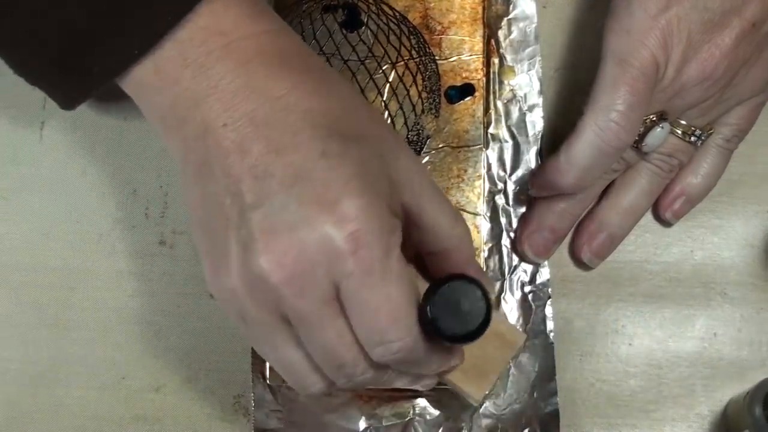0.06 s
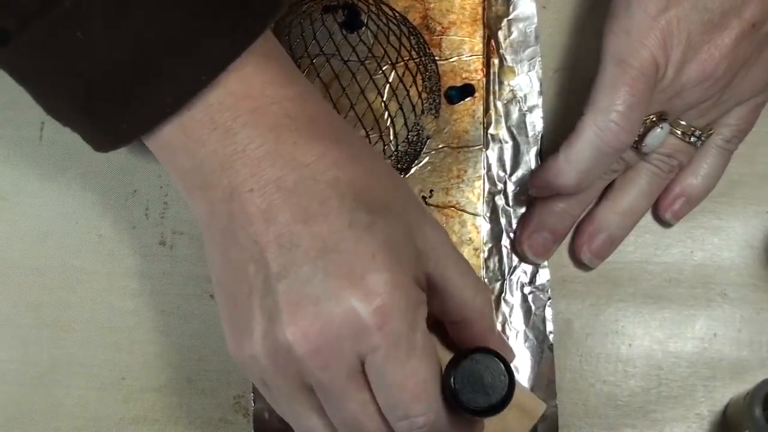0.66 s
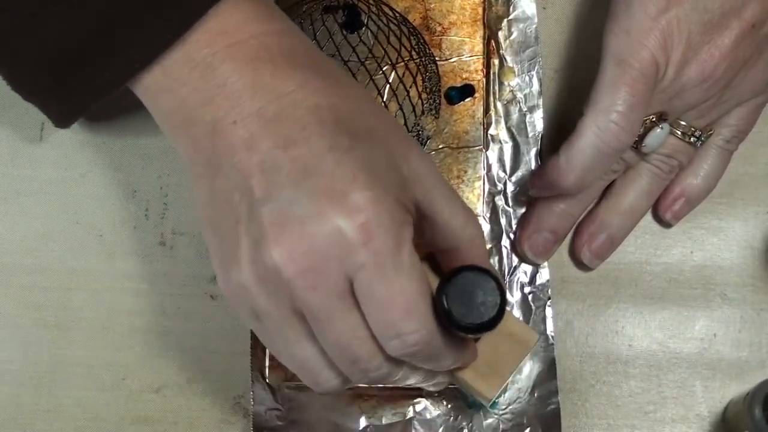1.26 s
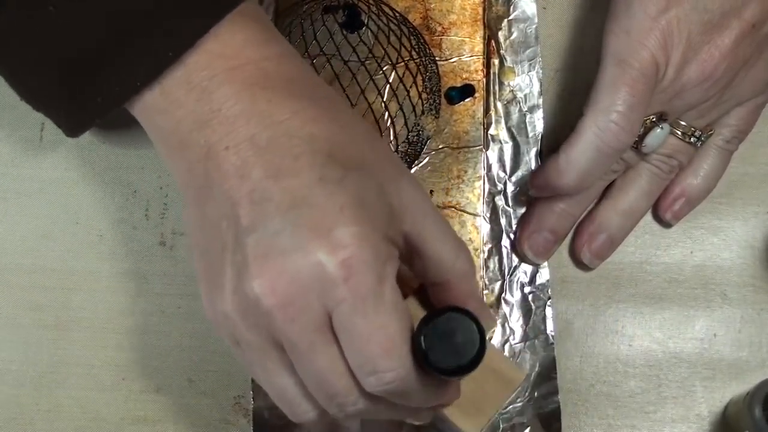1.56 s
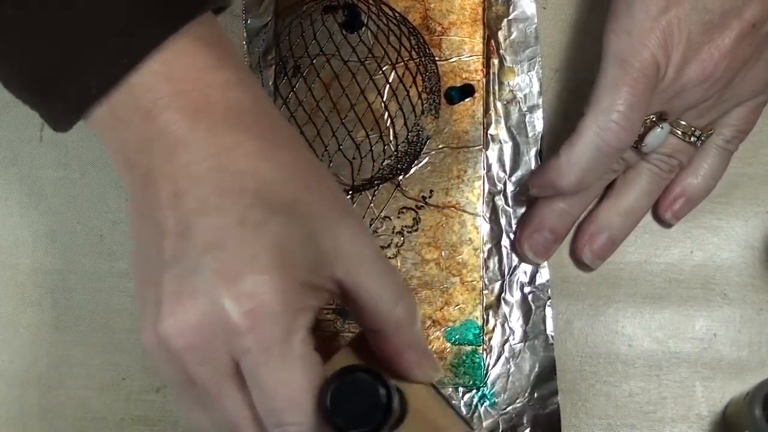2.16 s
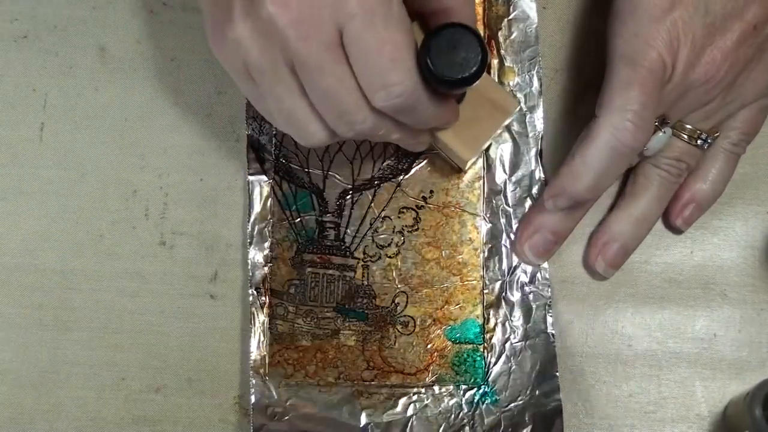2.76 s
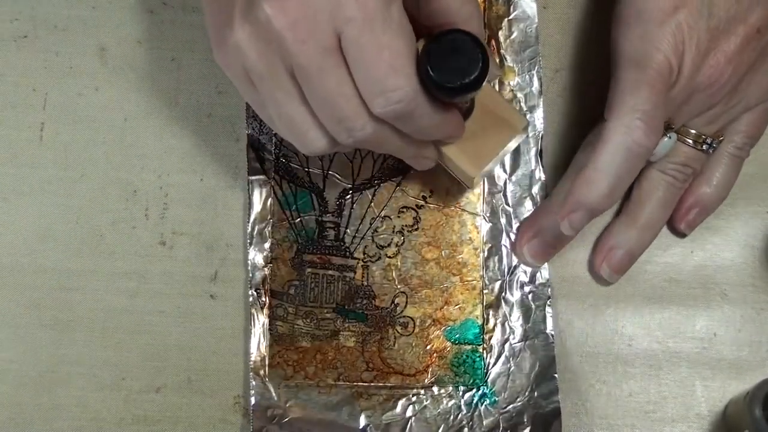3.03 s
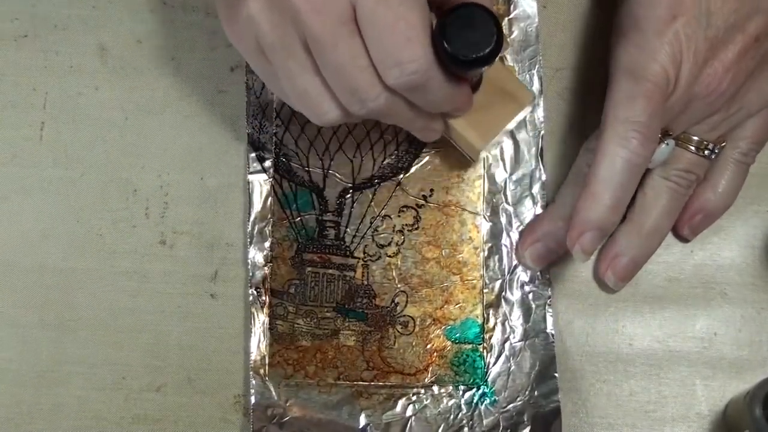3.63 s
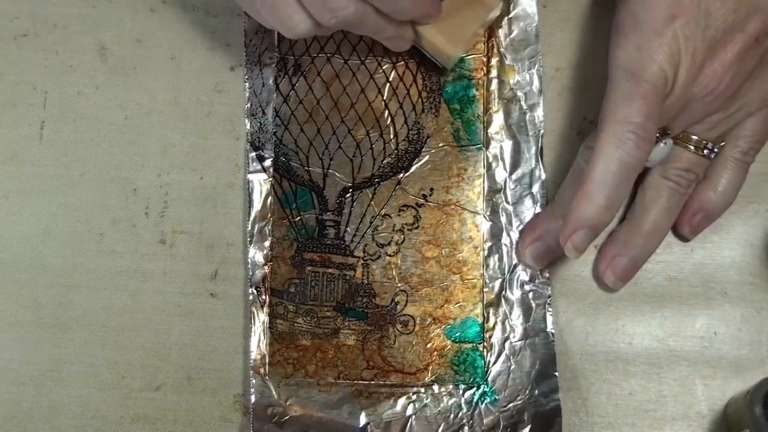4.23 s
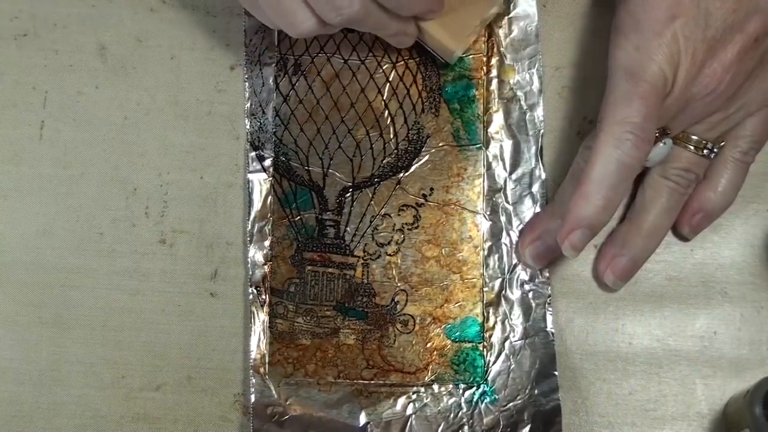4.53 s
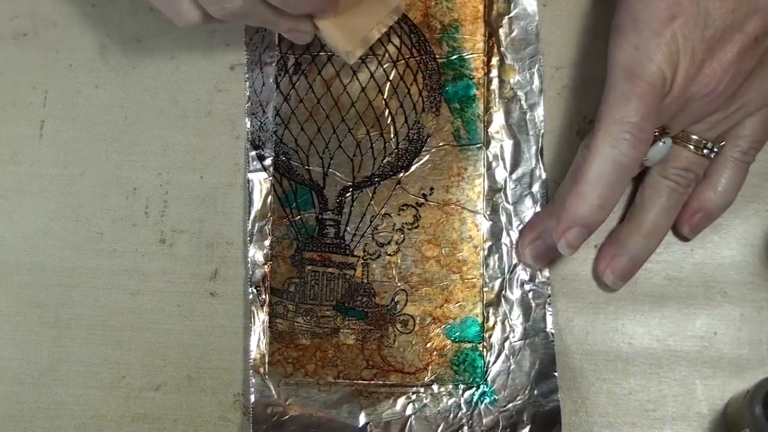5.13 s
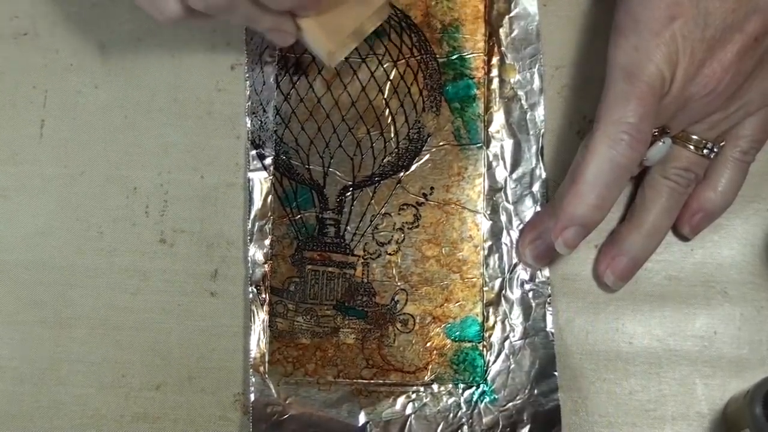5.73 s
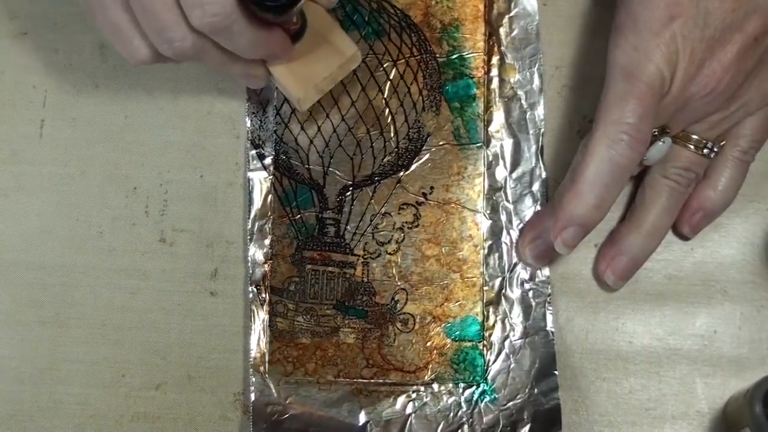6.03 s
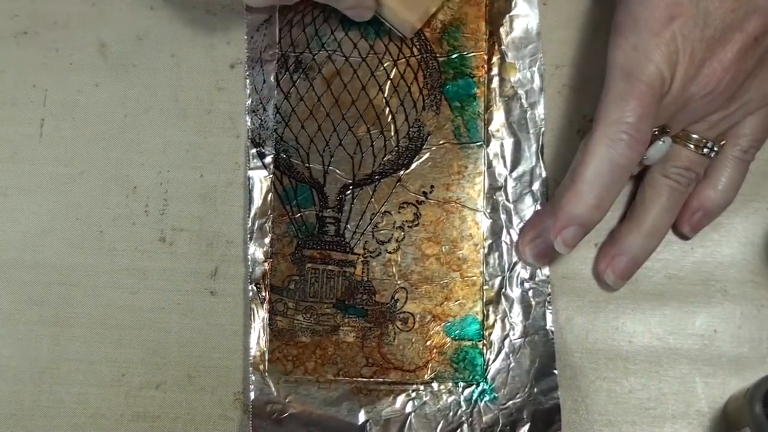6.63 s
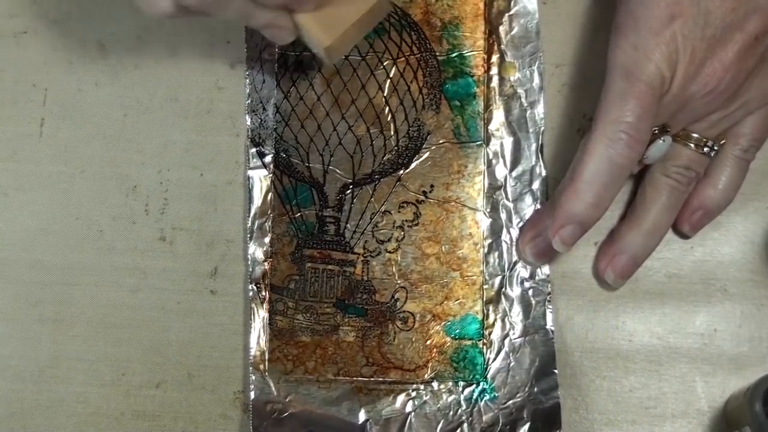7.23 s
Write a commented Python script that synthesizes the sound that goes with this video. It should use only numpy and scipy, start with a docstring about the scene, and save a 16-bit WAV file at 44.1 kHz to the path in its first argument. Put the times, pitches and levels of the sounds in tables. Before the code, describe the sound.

A felt pad on a wooden block dabs a foil-covered tag on a craft table, heard close in a small room. Each dab is a soft, low thump with a bright crinkle, often a sharp little foil snap, and a faint loose ticking as the pad peels away. From the start to about 2 seconds come ten uneven dabs with crisp snaps, the heaviest near 0.7 seconds. After a pause, dabbing resumes at 2.8 seconds, about six a second, with fuller, slightly duller crinkling and a strong snap near 3.9 seconds. It breaks off around 4.6 seconds and restarts at 5.1, easing near 6.5 seconds before two firmer dabs at about 7 and 7.2. A very soft arm brush and a faint rattle follow around 7.4 seconds. Quiet room hiss, low hum and a thin whine run throughout.

```python
"""In a small room with hiss and a thin whine, a felt ink pad on a wooden block dabs a foil-covered tag.
Each dab thumps the craft table and crushes the foil, which snaps as it buckles or peels off the tacky felt;
something loose chatters as the hand lifts. The first dabs land on the bright, bare foil border.
After a pause at two seconds the pad works up the duller, card-backed foil, about six dabs a second,
with a short break midway. A brush of the arm and a faint rattle end it as the hand swings away."""
import sys
import numpy as np
from scipy import signal
from scipy.fft import rfft, irfft
from scipy.io import wavfile
from scipy.ndimage import map_coordinates

SR = 44100
rng = np.random.default_rng(int(sys.argv[2]) if len(sys.argv) > 2 else 0)


def unload_wav(signal):
    """Save mono or channel-first audio to the path in sys.argv[1] as 16-bit WAV at rate SR, clipped to [-1, 1]."""
    wavfile.write(
        sys.argv[1],
        SR,
        np.round(np.clip(np.atleast_2d(signal).T, -1, 1) * 32767).astype(np.int16),
    )


N = 329956
TIME = np.arange(N) / SR
EVENT_TIME = np.arange(SR // 2) / SR


def undb(db):
    """Decibels to gain."""
    return 10 ** (np.asarray(db) / 20)


def unit(x):
    """Scale to rms 1."""
    return x / np.sqrt(np.mean(x ** 2))


def add(track, start_s, x):
    """Mix x into the track from start_s on."""
    start = min(round(start_s * SR), N)
    x, start = x[max(-start, 0):], max(start, 0)
    track[start:start + len(x)] += x[:N - start]


def band(x, lo_hz, hi_hz, order=2):
    """Band-pass."""
    return signal.sosfilt(signal.butter(order, [lo_hz, hi_hz], "band", fs=SR, output="sos"), x)


def resonate(x, modes):
    """Ring x through parallel resonances: pitch_hz, width_hz, level_db."""
    return sum(undb(db) * signal.lfilter(*signal.iirpeak(hz, hz / width, SR), x)
               for hz, width, db in modes)


def coloured(curve):
    """Noise of rms 1 shaped by an EQ curve: frequency_hz, level_db."""
    hz, db = np.transpose(curve)
    bins_hz = np.maximum(np.arange(N // 2 + 1) * SR / N, 1)
    gain = undb(np.interp(np.log(bins_hz), np.log(hz), db))
    return unit(irfft(rfft(rng.standard_normal(N)) * gain, N))


def crackle(per_s, spread_db):
    """Dense tiny clicks of uneven size."""
    clicks = (rng.random(N) < per_s / SR) * rng.choice([-1, 1], N)
    return clicks * undb(spread_db * np.minimum(rng.exponential(size=N), np.pi))


def swell(peak_s, width_s, db):
    """A bell-shaped envelope around peak_s."""
    envelope, middle_s = np.zeros(N), EVENT_TIME.mean()
    add(envelope, peak_s - middle_s, undb(db) * np.exp(-((EVENT_TIME - middle_s) / width_s) ** 2))
    return envelope


def stereo(mid, side, width):
    """Mid and side to left and right; close microphones hear nearly the same."""
    return mid + width * side * np.array([[1], [-1]])


def reverb(x, t60_s, lo_hz, hi_hz, db, width):
    """Diffuse tail of a small room, different at the two microphones."""
    tail = band(rng.standard_normal((2, len(EVENT_TIME))), lo_hz, hi_hz)
    tail *= np.exp(-np.log(1000) * EVENT_TIME / t60_s) * (1 - np.exp(-EVENT_TIME / 0.0014))
    tail *= undb(db) / np.sqrt(np.sum(tail ** 2, axis=1, keepdims=True))
    mid, side = signal.fftconvolve(x[None], tail, axes=1)[:, :N]
    return stereo(mid, side, width)


# hum and whine of the room and camera: pitch_hz, level_db
HUM_TONES = [(107.7,-71.5),(1440,-83),(2281,-72.5)]
# EQ of the room tone, centre and sides: frequency_hz, relative_db
ROOM_MID_EQ = [(15,-39),(26,-6),(38,2),(52,-10),(75,5.5),(130,1.5),(240,-2),(560,-10),(1020,-13),(1480,-15),(1940,-17),(2400,-15.5),(3820,-19.5),(8500,-19.5),(16000,-24.5)]
ROOM_SIDE_EQ = [(15, -66), (25, -40), (58, -35), (92, -15), (166, -13.5), (489, -11), (1940, -20),
                (2220, -22.5), (6920, -33), (13200, -44.5), (16000, -80)]
def room_tone(mid_db=-57.5, side_db=-59.5):
    """A bed of room rumble and microphone hiss, with a fluttering hum and whine."""
    tones = sum(undb(db) * np.sqrt(2) * np.sin(2 * np.pi * (hz * TIME + rng.random()))
                for hz, db in HUM_TONES)
    flutter = 1 + 0.23 * unit(band(rng.standard_normal(N), 8, 46))
    mid = undb(mid_db) * coloured(ROOM_MID_EQ) + tones * flutter
    return stereo(mid, coloured(ROOM_SIDE_EQ), undb(side_db))


# arm moves: peak_s, half_length_s, level_db
ARM_BRUSHES = [(0.617,.015,-62),(2.385,0.022,-61),(4.385,0.031,-63.5),(6.383,0.028,-62.5),(7.376,0.035,-61.5)]
def sleeve():
    """A soft brush as the arm shifts over the tag."""
    envelope = sum(swell(*brush) for brush in ARM_BRUSHES)
    return envelope * unit(band(rng.standard_normal(N), 680, 1430))


# the dabs, which cue block, chatter, rustle, thump and crush:
# hit_s, thump_db, crush_db, crush_length_s, peel_db, first_tick_db
DAB_CUES = [(0.002, -36.5, -44, 0.018, -65, -66), (0.302, -34.5, -48.5, 0.014, -57, -49.5),
            (0.507, -30.5, -59, 0.004, -56, -56), (0.6877, -22.5, -44, 0.021, -54.5, -50),
            (1.147, -37, -54, 0.012, -75, -66), (1.3612, -37.5, -48.5, 0.018, -69, -72),
            (1.5337, -31.5, -51, 0.012, -69, -59), (1.703, -28.5, -50, 0.005, -58, -51.5),
            (1.872, -31.5, -55, 0.0065, -52.5, -52), (2.043, -27, -58, 0.004, -58, -52),
            (2.801, -38.5, -37.5, 0.0041, -60, -55.5), (3, -34, -36, 0.01, -72, -61),
            (3.173, -30, -37.5, 0.013, -58, -48.5), (3.3453, -30.5, -35, 0.0056, -68, -51.5),
            (3.5244, -33, -35.5, 0.023, -72, -49), (3.7098, -32, -32.5, 0.019, -62, -48),
            (3.883, -30.5, -34, 0.02, -51, -48), (4.062, -30.5, -40, 0.051, -57, -54),
            (4.236, -35.5, -42, 0.043, -64, -50), (4.397, -43.5, -52.5, 0.005, -71, -63),
            (4.5528, -30.5, -38.5, 0.02, -68, -55), (5.1267, -32.5, -38.5, 0.019, -59, -64),
            (5.307, -31.5, -39.5, 0.02, -54, -44.5), (5.473, -33.5, -42.5, 0.049, -55, -48),
            (5.6606, -27.5, -40.5, 0.075, -71, -54), (5.8317, -30.5, -47.5, 0.064, -73, -47.5),
            (6.0016, -34.5, -44.5, 0.034, -67, -48), (6.1567, -34.5, -48, 0.017, -79, -58.5),
            (6.335, -34, -45, 0.0055, -59.5, -55), (6.506, -41, -53, 0.006, -52, -63),
            (6.6613, -43, -60, 0.006, -54, -74), (6.8184, -37, -55, 0.0049, -55.5, -53.5),
            (6.9962, -29.5, -41.5, 0.04, -58, -55), (7.171, -25.5, -41.5, 0.083, -65, -48)]
# resonances of the wooden block: pitch_hz, width_hz, level_db
BLOCK_MODES = [(530,500,7.5),(900,260,3.5),(1260,190,9.5),(1657,210,9.5)]
def block_knocks(lead_s=0.0067, rise_s=0.0036, fade_s=0.019, gain_db=-25):
    """A little of each blow gets through the felt into the wooden block."""
    knock = (1 - np.exp(-EVENT_TIME / rise_s)) * np.exp(-EVENT_TIME / fade_s)
    envelope = np.zeros(N)
    for hit_s, thump_db, *_ in DAB_CUES:
        add(envelope, hit_s - lead_s, undb(thump_db + gain_db) * knock)
    return envelope * unit(resonate(band(rng.standard_normal(N), 280, 2130), BLOCK_MODES))


# rattles as the hand swings away from the tag: start_s, first_tick_db
HAND_SWINGS = [(2.18, -50.5), (7.423, -54)]
# resonances of the loose thing: pitch_hz, width_hz, level_db
CHATTER_MODES = [(1720,300,-7),(2400,400,-8),(3000,400,-8),(5100,300,3),(6900,800,0),(8200,1100,-3)]
def chatter(period_s=0.03, jitter=0.094, fall_db=8.5, scatter_db=2.5, gain_db=3.5, count=4):
    """Something loose ticks once on the downstroke, then rocks in fading ticks as the hand lifts."""
    downstroke_lead_s, downstroke_db, lift_lag_s = 0.0217, -10.5, 0.066
    rise_s, fade_s = 0.0026, 0.0037
    ticks = [(hit_s - downstroke_lead_s, db + downstroke_db) for hit_s, *_, db in DAB_CUES]
    lifts = [(hit_s + lift_lag_s, db) for hit_s, *_, db in DAB_CUES]
    turn = np.arange(count)
    for start_s, db in lifts + list(HAND_SWINGS):
        slips, sizes = rng.standard_normal((2, count))
        times_s = start_s + period_s * (turn + jitter * slips)
        ticks += zip(times_s, db - fall_db * turn + scatter_db * sizes)
    contact = (1 - np.exp(-(EVENT_TIME / rise_s) ** 2)) * np.exp(-EVENT_TIME / fade_s)
    envelope = np.zeros(N)
    for tick_s, db in ticks:
        add(envelope, tick_s - 2 * rise_s, undb(db + gain_db) * contact / contact.max())
    grains = band(crackle(per_s=9700, spread_db=4.5), 1120, 6940, order=3)
    return resonate(envelope * grains, CHATTER_MODES) / np.std(resonate(grains, CHATTER_MODES))


# the pad's path along the tag: time_s, place
PAD_PATH = [(2.1, 0), (2.8, 0.21), (3.35, 0.35), (3.88, 0.67), (4.1, 0.97), (5.5, 0.96), (6.2, 0.79),
            (7.0, 1)]
def place_at(time_s):
    """Where the pad works: 0 is the near end of the tag, 1 the far end."""
    return np.interp(time_s, *np.transpose(PAD_PATH))


def under_pad(time_s, border, card, border_reach=0.096):
    """Crossfade a setting from bare foil border to card-backed foil as the pad moves up the tag."""
    return card + (border - card) * np.exp(-(place_at(time_s) / border_reach) ** 2)


def foil_rustles(graze_lead_s=0.01, graze_width_s=0.011):
    """Fine crinkling as the tacky pad grazes the foil and peels off; the loose border clings longer."""
    envelope = np.zeros(N)
    for hit_s, *_, peel_db, _ in DAB_CUES:
        graze_db = under_pad(hit_s, border=-49.5, card=-62.5)
        peel_lag_s = under_pad(hit_s, border=0.075, card=0.054)
        peel_width_s = under_pad(hit_s, border=0.056, card=0.019)
        envelope += swell(hit_s - graze_lead_s, graze_width_s, graze_db)
        envelope += swell(hit_s + peel_lag_s, peel_width_s, peel_db)
    grains = crackle(per_s=4200, spread_db=6)
    return envelope * unit(band(grains, 5900, 9900) + undb(-2) * band(grains, 2740, 7100))


# ring of the table top, struck at either end of the tag: pitch_hz, t60_s, near_db, far_db
TABLE_MODES = [(59,.36,0,9.5),(106,.18,-6,9.5),(150.4,.2,12.3,11.2),(223,.07,10.4,4.1),(267.6,.15,12,7.2),(308.9,.14,7,-1),(375,.16,5,9),(432,.17,-2,13)]
# early reflections of the thump: delay_s, gain
THUMP_ECHOES = [(.00704,.05),(.01198,-.26),(.02017,.39)]
def table_thumps(usual_db=-31, usual_contact_s=0.001352, halving_db=24.5, lead_s=0.015):
    """The felt gives a soft push; the table top springs back and rings according to where it is hit."""
    rebound_lag, rebound_width = 0.53, 2.15  # in contact times
    direct = np.zeros(N)
    for hit_s, db, *_ in DAB_CUES:
        # a harder dab squeezes the felt faster, so the contact is shorter
        contact_s = usual_contact_s * 2 ** ((usual_db - db) / halving_db)
        phase = (EVENT_TIME - lead_s) / contact_s
        rebound = np.exp(-((phase - rebound_lag) / rebound_width) ** 2) / rebound_width
        push = np.exp(-phase ** 2) - rebound
        modes = [(hz, np.log(1000) / np.pi / t60_s, near_db + (far_db - near_db) * place_at(hit_s))
                 for hz, t60_s, near_db, far_db in TABLE_MODES]
        add(direct, hit_s - lead_s, undb(db) * (push + resonate(push, modes)))
    heard = direct.copy()
    for delay_s, gain in THUMP_ECHOES:
        add(heard, delay_s, gain * direct)
    return heard


def wander(x, depth, rate_hz):
    """Waver the pitch of x, as the pad meets other wrinkles."""
    speed = 1 + depth * unit(band(rng.standard_normal(N), rate_hz, 2 * rate_hz))
    return map_coordinates(x, [np.cumsum(speed)], order=3, mode="mirror")


# resonances of the foil-covered tag: pitch_hz, width_hz, level_db
TAG_MODES = [(2702,200,2),(2904,165,8),(4170,250,3),(5200,870,2),(7530,670,15.5),(8700,240,18),(10400,1200,-38)]
def foil_crushes(touch_s=0.0026, touch_db=-7, peak_s=0.0047, rise_s=0.006,
                 settle_s=0.073, settle_db=-21, gain_db=3):
    """Crinkling swells as the felt lands, peaks as it bears down, then settles; the treble dies first."""
    body_decay, top_decay = 0.28, 0.2072  # shares of the crush length
    t = EVENT_TIME - 0.05
    past_peak = np.maximum(t - peak_s, 0)
    landing = undb(touch_db) * np.exp(-np.abs(t + peak_s / 2) / touch_s)
    attack = np.exp(-(np.minimum(t - peak_s, 0) / rise_s) ** 2)
    settling = undb(settle_db) * np.exp(-past_peak / settle_s)
    body_envelope, top_envelope = np.zeros((2, N))
    for hit_s, _, db, length_s, *_ in DAB_CUES:
        tilt_db = under_pad(hit_s, border=6, card=-1.2)  # bare foil is brighter
        layers = (body_envelope, body_decay, -tilt_db / 2), (top_envelope, top_decay, tilt_db / 2)
        for envelope, decay, trim_db in layers:
            press = attack * (np.exp(-past_peak / (decay * length_s + rise_s)) + settling)
            add(envelope, hit_s + t[0], undb(db + trim_db) * np.hypot(press, landing))
    tag = resonate(crackle(per_s=2600, spread_db=3.5), TAG_MODES)
    grains = band(wander(tag, depth=0.0365, rate_hz=12), 2540, 11500, order=4)
    body = unit(band(grains, 570, 5380)) * body_envelope
    top = unit(band(grains, 3990, 18900)) * top_envelope
    return undb(gain_db) * (body + top) / np.sqrt(2)


# foil snaps, with ring and air set against the crack: start_s, level_db, ring_hz, ring_db, air_db
SNAP_CUES = [(0.0004, -20.5, 3300, -17.5, -5), (0.2953, -33.5, 4737, 1, 3), (0.3324, -35, 4440, -19, -3),
             (0.366, -39, 2920, -8, -17), (0.3834, -32, 4070, -9, -13), (0.4985, -28.5, 4300, -8, 3),
             (0.5034, -31.5, 3060, -10, -10), (0.595, -23.5, 2950, -8, -28), (0.6708, -17.5, 3510, -10, -6),
             (1.1408, -29.5, 3520, -12.5, -8), (1.2329, -27, 3540, -12.5, -20), (1.355, -36, 4128, -8, -2),
             (1.5382, -39, 2800, -20, -15), (1.5906, -34.5, 3230, -9, -17), (1.695, -35.5, 2920, -14, -8),
             (1.7684, -27.5, 4300, -9.5, -21), (1.8679, -22, 3840, -7, -2), (1.9131, -38, 4865, -18, -8),
             (1.9449, -27, 4300, -10, -14), (2.0356, -27.5, 4030, -9.5, -9), (2.1253, -24, 4140, -14, -22),
             (2.8065, -39.5, 2800, -4, -25), (3.1714, -29, 3030, -24, -33), (3.701, -31, 2770, -4, -7),
             (3.7145, -31.5, 4200, 8, -22), (3.8842, -16.5, 4380, -4.5, -12),
             (4.1104, -34.5, 2930, -5, -13), (4.2984, -35, 2950, -2.5, -27), (4.394, -39, 4730, -3, -5),
             (4.4628, -24.5, 4130, -4, -12), (4.546, -30, 2960, -10, -5), (4.605, -27.5, 4000, -5, -22),
             (5.303, -31, 2580, -13, 2), (5.364, -40, 4440, -8, -12), (5.4794, -32.5, 2750, -2, -12),
             (5.5242, -29, 4630, -2, -8), (5.658, -28.5, 2950, -9, 13), (6.0055, -35, 4840, -8, -8),
             (6.0357, -30, 2800, -2.5, -37), (6.33, -41.5, 3050, 10, -9), (6.5039, -35, 2900, -2.5, 0),
             (6.566, -34, 3980, -0.5, -23), (6.586, -39, 3930, -9, -22), (6.6415, -35.5, 4700, -11, -17),
             (6.659, -36.5, 4500, -10, -13), (6.813, -34, 2930, -15, -5), (6.9877, -33, 2930, -14, -15),
             (7.0382, -33.5, 4740, -6, -19), (7.1642, -31.5, 2810, -3, 1), (7.214, -33, 2900, 2, -16),
             (7.225, -24, 4700, -16, -31)]
def foil_snaps(rise_s=0.0011, crack_s=0.002, tail_s=0.0083, tail_db=-16, ring_s=0.0042,
               ring_width_hz=450, crack_width_hz=2600, hz_per_air_db=34, card_db=-24, gain_db=-1):
    """A facet of foil pops over: a sharp crack and a brief lower ring, pitched by the facet's size."""
    out, t = np.zeros(N), EVENT_TIME[:SR // 12]
    attack = 1 - np.exp(-t / rise_s)
    burst = attack * (np.exp(-t / crack_s) + undb(tail_db) * np.exp(-t / tail_s))
    burst_rms = np.sqrt(np.mean(burst ** 2))
    for start_s, db, ring_hz, ring_db, air_db in SNAP_CUES:
        # an airier snap also cracks higher
        crack_hz = under_pad(start_s, border=9280, card=8720) + hz_per_air_db * air_db
        ring_noise, crack_noise, air_noise = rng.standard_normal((3, len(t)))
        ring_drive = band(ring_noise * attack * np.exp(-t / ring_s), 2100, 4450)
        ring = resonate(ring_drive, [(ring_hz, ring_width_hz, 0)])
        crack = resonate(band(crack_noise * burst, 2840, 11100), [(crack_hz, crack_width_hz, 0)])
        air = band(air_noise * burst, 5900, 16000)
        snap = unit(undb(ring_db) * unit(ring) + unit(crack) + undb(air_db) * unit(air))
        card_tap = undb(card_db) * unit(band(air_noise * burst, 1600, 2500))
        add(out, start_s, undb(db + gain_db) * (snap + card_tap) * burst_rms)
    return out


def scene():
    """Table and foil close below the microphones, with the room around them."""
    table = table_thumps()
    foley = foil_crushes() + foil_snaps() + foil_rustles() + chatter() + block_knocks() + sleeve()
    low_room = reverb(table, t60_s=0.3, lo_hz=200, hi_hz=620, db=-30, width=0.8)
    high_room = reverb(foley, t60_s=0.13, lo_hz=1030, hi_hz=9000, db=-15, width=0.56)
    pan = undb([[-0.29], [0.29]])  # the tag lies slightly to the right
    return table + pan * foley + low_room + high_room + room_tone()


def record(dry):
    """The overhead camera cuts the top octave's upper edge steeply."""
    cutoff_hz = 15950
    return signal.sosfilt(signal.ellip(10, 0.1, 70, cutoff_hz, fs=SR, output="sos"), dry)


dry = scene()
out = record(dry)
unload_wav(out)
```